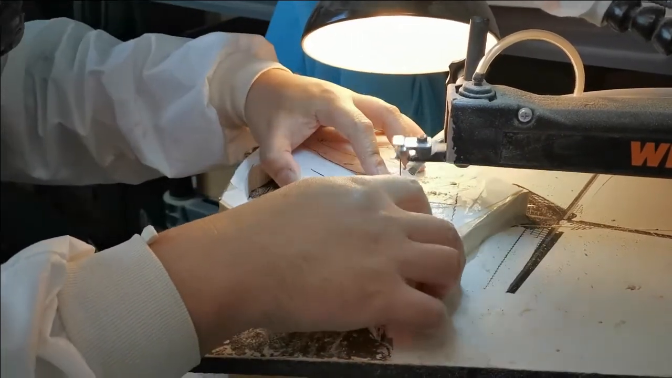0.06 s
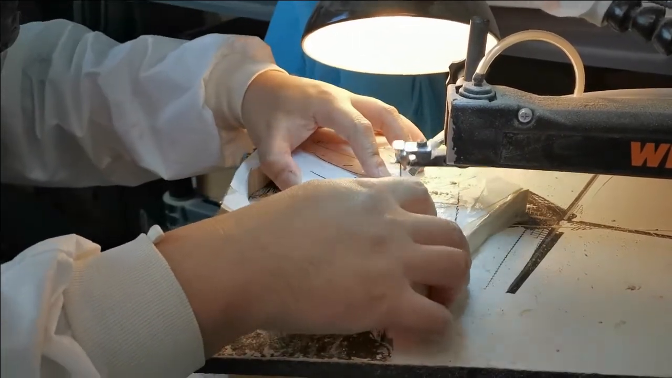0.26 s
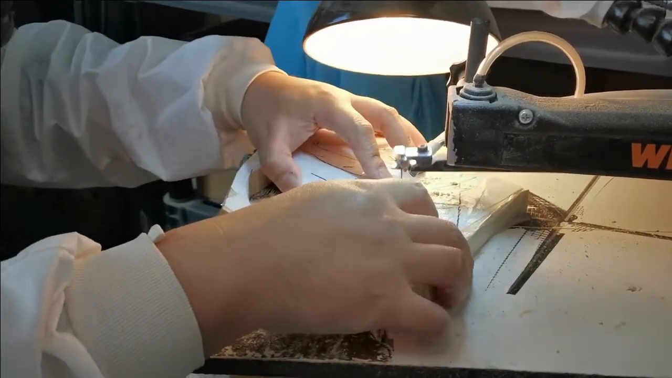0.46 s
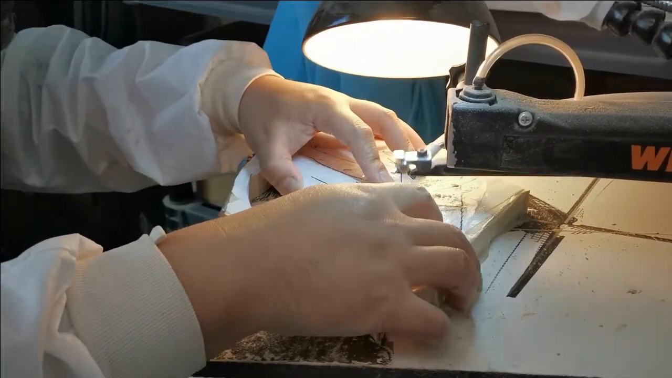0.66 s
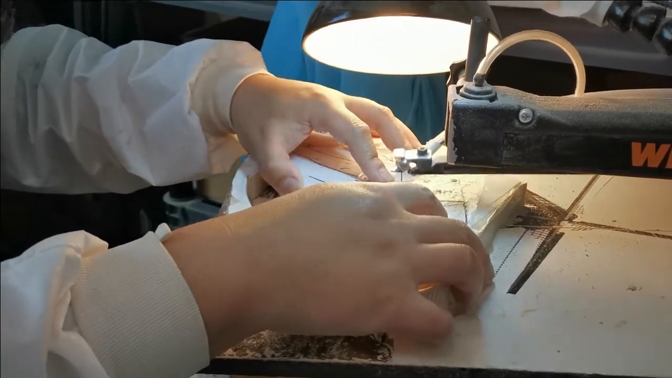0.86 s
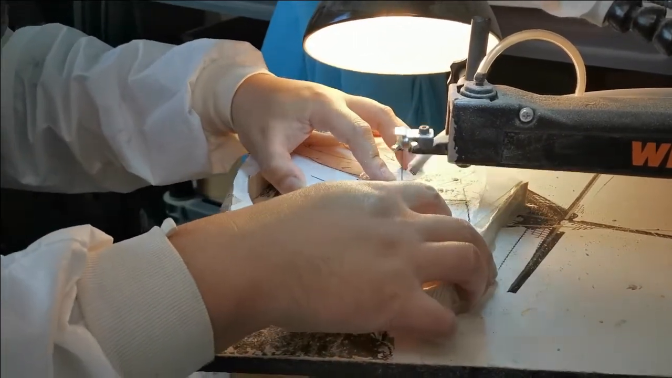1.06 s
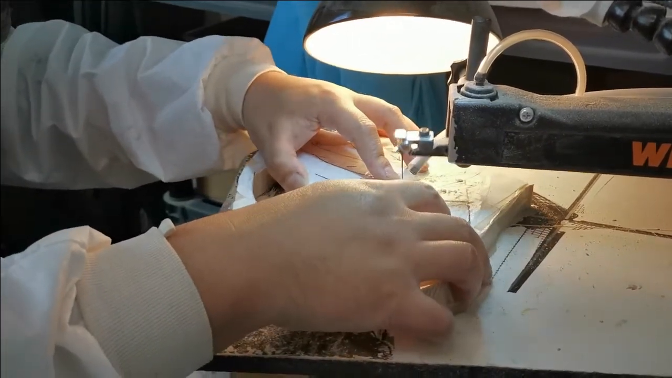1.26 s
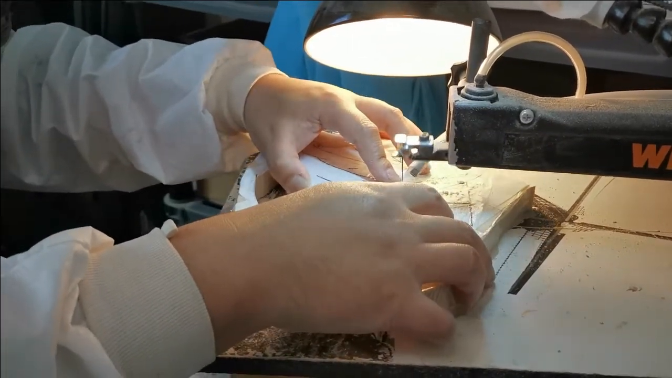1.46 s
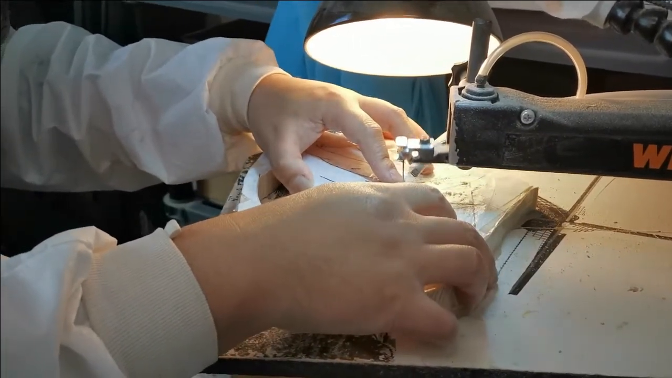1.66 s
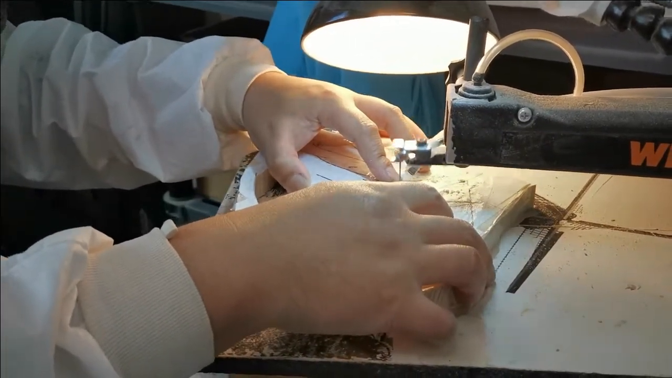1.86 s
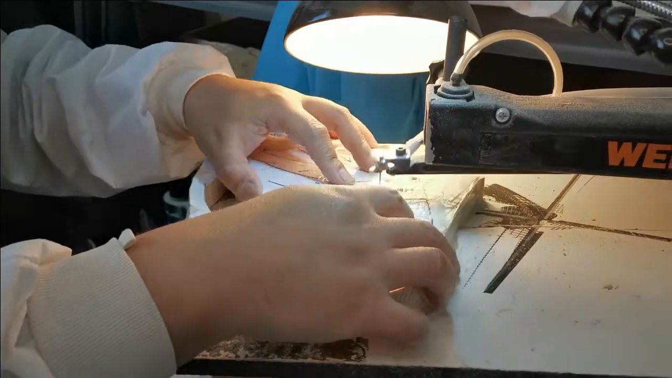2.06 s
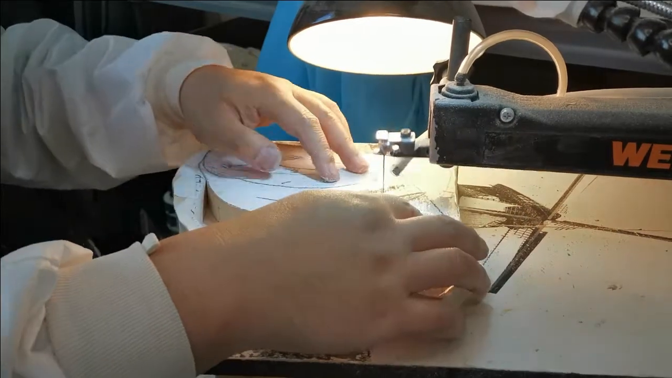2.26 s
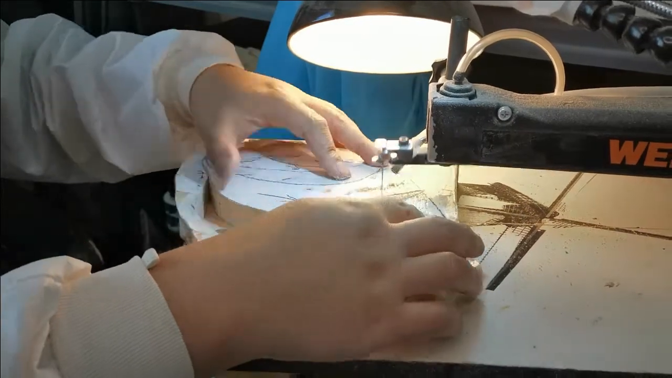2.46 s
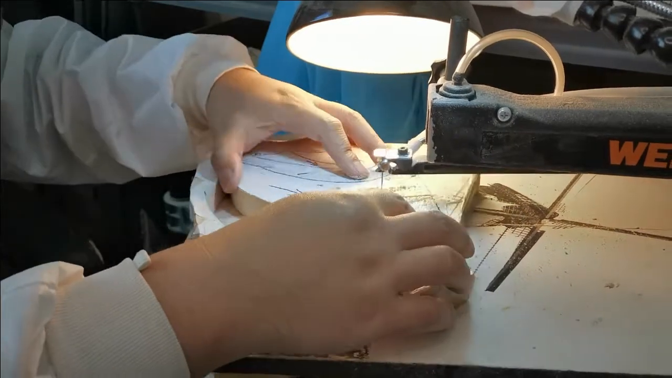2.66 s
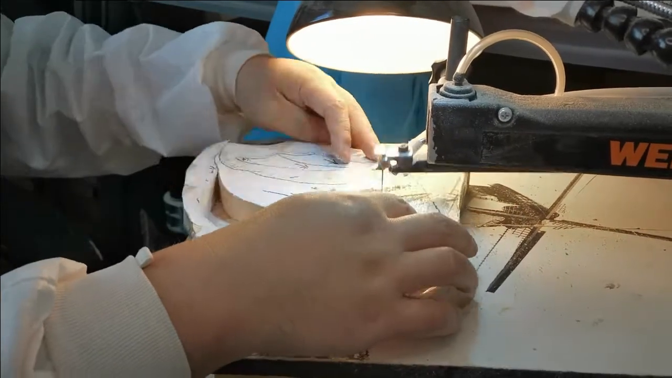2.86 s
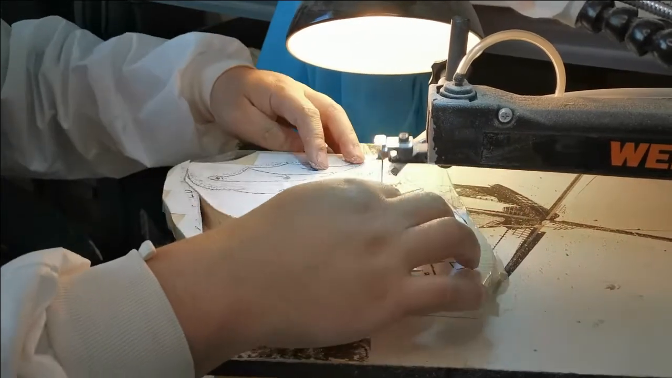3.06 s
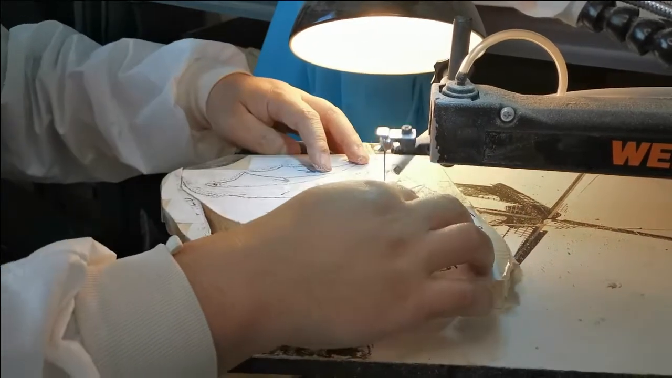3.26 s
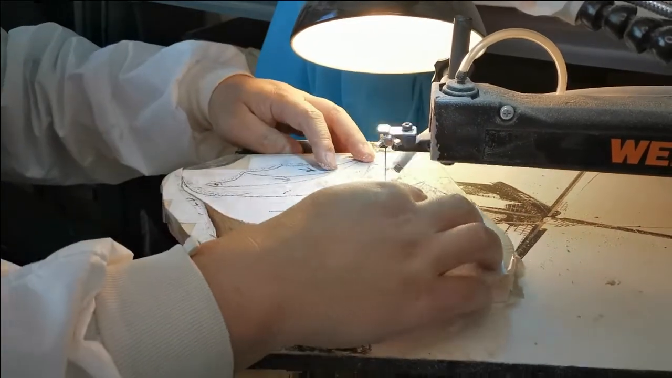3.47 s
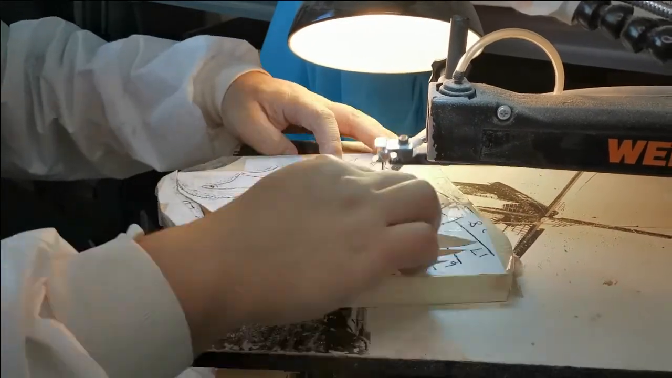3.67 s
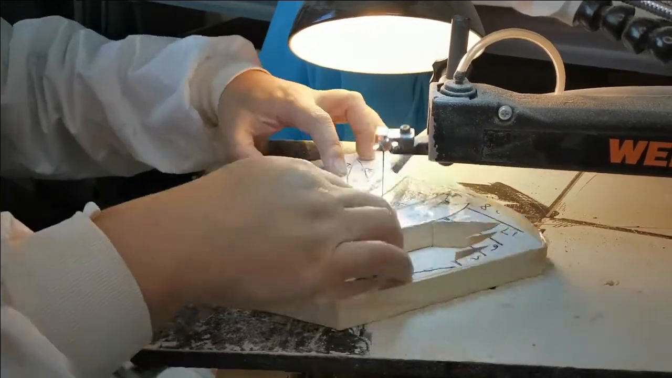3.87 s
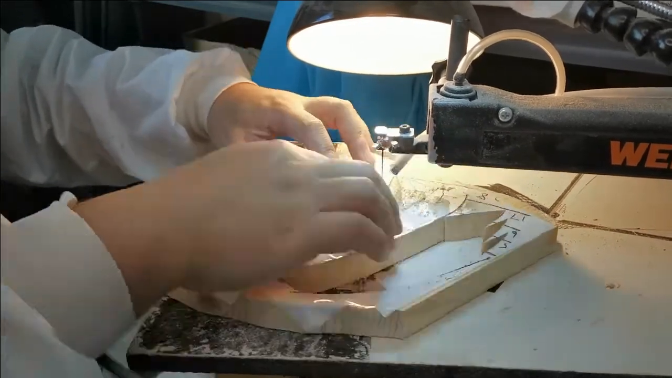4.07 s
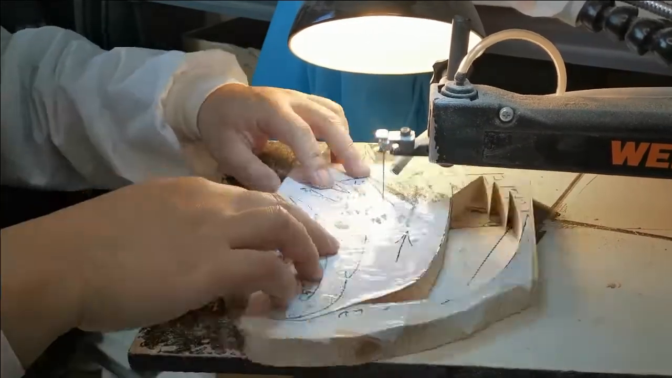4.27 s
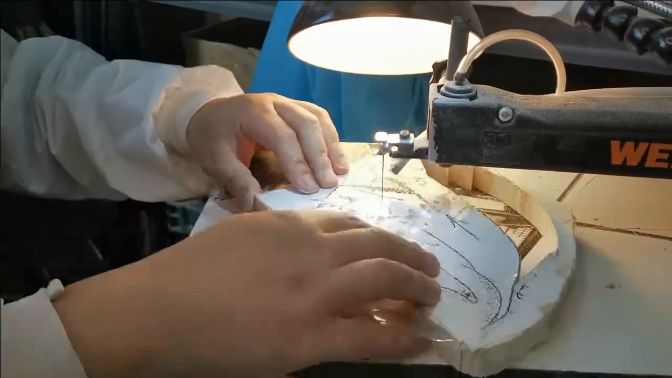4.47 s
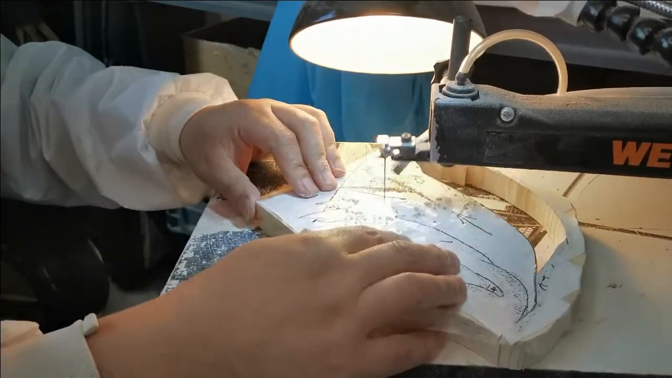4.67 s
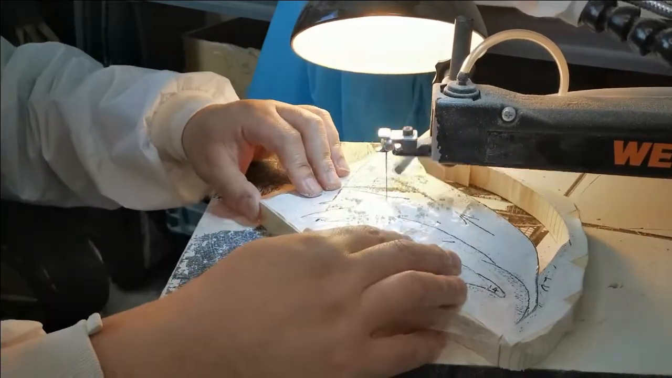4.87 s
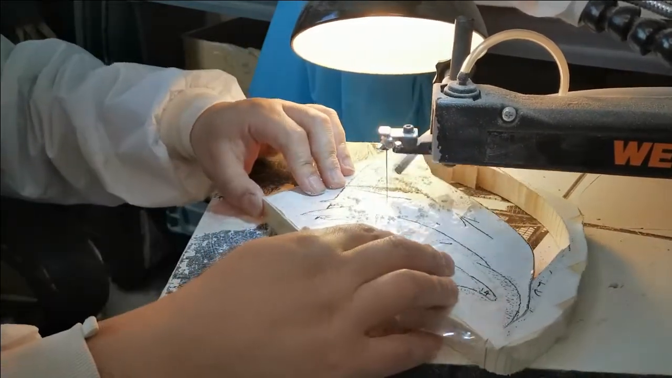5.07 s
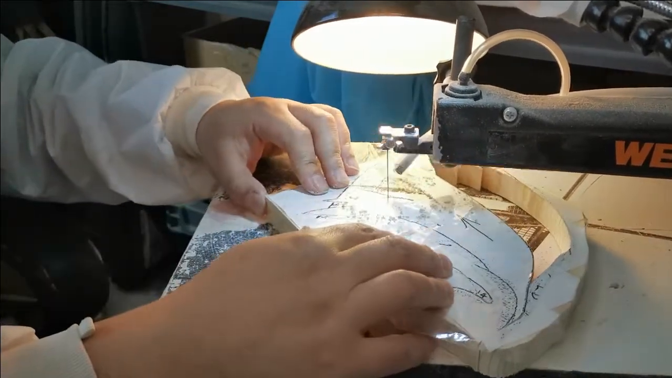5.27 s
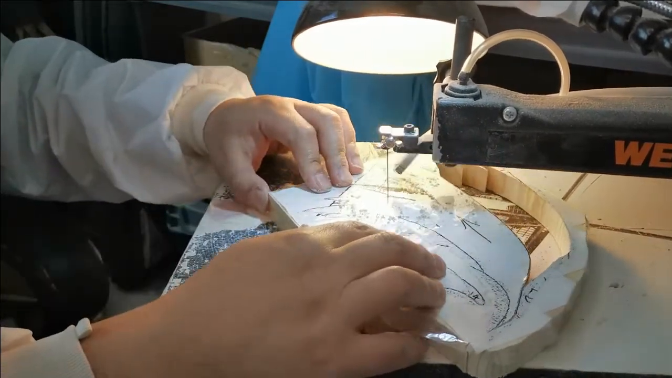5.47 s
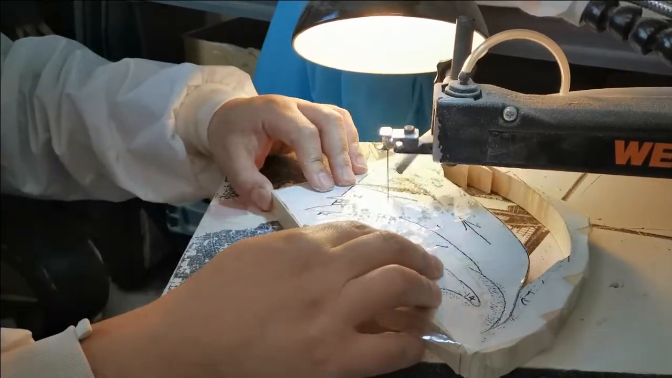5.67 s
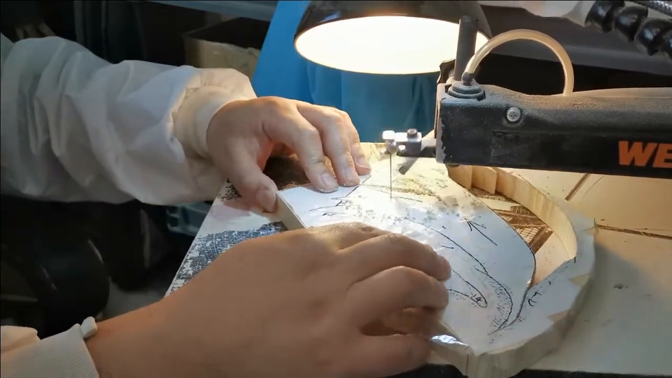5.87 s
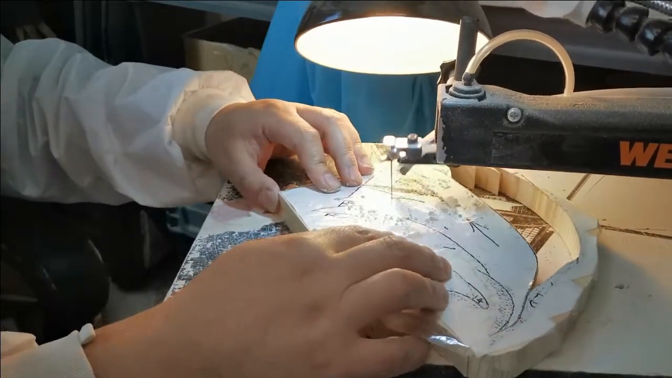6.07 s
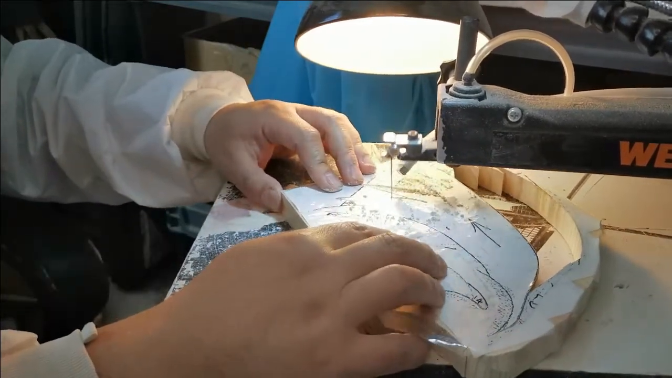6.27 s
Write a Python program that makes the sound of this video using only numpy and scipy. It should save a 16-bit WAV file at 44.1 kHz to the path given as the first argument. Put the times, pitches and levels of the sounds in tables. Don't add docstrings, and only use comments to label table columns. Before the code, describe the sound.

Close up, a fine-bladed powered saw chews wood in a dense, rapid buzz with uneven bites and slight gaps. The load drops after two seconds; the motor whines more exposed while teeth graze the board intermittently and wood drags on the metal table. Just before five seconds steady cutting returns with a harder metallic edge and lasts to the end, in a small indoor workshop.

```python
import sys
import numpy as np
from scipy import signal
from scipy.fft import rfft, irfft
from scipy.io import wavfile
from scipy.ndimage import uniform_filter1d

SR = 44100
rng = np.random.default_rng(int(sys.argv[2]) if len(sys.argv) > 2 else 0)


def pcm_store(signal):
    levels = np.round(np.clip(np.atleast_2d(signal), -1, 1) * 32767)
    wavfile.write(sys.argv[1], SR, levels.astype(np.int16).T)


def voltage_ratio(level):
    return 10 ** (np.asarray(level, float) / 20)


N = 278712
TIME, HZ = np.arange(N) / SR, np.arange(N // 2 + 1) * SR / N
SIDES = np.array([[.5], [-.5]])

# frequency in Hz, density in dB per Hz.
SHOP_SPECTRUM = [(25, -18.5), (90, -22), (280, -22.5), (480, -13.5), (1000, -12.5), (1300, -18.5),
                 (1900, -9.5), (2450, -15.5), (2900, -8.5), (3400, -18.5), (3900, -11.5), (5000, -20),
                 (6500, -17), (16000, -21)]
# multiple of the electrical tone, then idle level in dB of crank sidebands -4 to +4.
WHINE_TONES = [(1, -107, -94.5, -93, -87.5, -66, -111, -87, -85, -80),
               (2, -93, -78.5, -82, -62, -95, -57, -68, -76, -66.5),
               (3, -99, -77, -94, -79, -66.5, -82, -96, -81, -72.5),
               (4, -81, -80, -75.5, -81, -60, -59.5, -100, -77.5, -86),
               (5, -77, -90, -100, -99, -83, -99, -74, -71.5, -88),
               (6, -92, -94, -75, -105, -63, -92, -83, -105, -86),
               (8, -86, -83, -86, -73, -58.5, -62.5, -97, -89, -73),
               (10, -84, -88, -90, -86, -70.5, -88, -67, -87, -73),
               (12, -71, -112, -85, -55, -59.5, -53, -115, -83, -75)]
SIDEBAND_LOAD = [0.17, 0.62, 0.84, 0.32, 0.15, 0.35, 0.16, 0.55, 0.39]
# multiple of the stroke rate, level under feed in dB, level of the idle linkage in dB.
SHAKE_TONES = [(0.98, -43, -97), (2.01, -36, -95), (2.96, -30.5, -101), (4.07, -30, -94), (5.004, -18, -89),
               (6.01, -17, -98), (6.997, -1.5, -74), (8.03, -13, -85), (8.995, 1, -64.5), (10.08, -13, -74),
               (10.997, -6.5, -67), (11.87, -20.5, -75), (13.08, -24, -74), (13.76, -19, -80),
               (14.83, -17, -74.5), (16.03, -18, -95), (17.08, -8.5, -68.5), (18.12, -16, -75),
               (18.88, -8, -85), (19.95, -5.5, -72), (21.06, -9.5, -68.5), (22.14, -10, -85),
               (22.8, -13.5, -92), (24.34, -14, -81)]
# time in seconds, lead in ms.
CRANK_LEAD = [(0, 6.1), (.2, 6.3), (.6, 5.4), (1.2, 3.3), (1.8, 1.8), (2, 2.2), (2.2, 3.5), (2.4, 5.7),
              (2.6, 6.7), (3.2, 12.1), (3.4, 12.2), (3.8, 14.7), (4.2, 16.4), (4.6, 15.8), (5.2, 15.1),
              (5.4, 14.2), (6, 12.3), (6.32, 12.1)]
# start in seconds, length in seconds, level in dB.
DRAG_PULLS = [
    (2.15, 0.27, -62),
    (2.95, .4, -55),
    (3.853, 0.5, -53),
    (4.198, 0.29, -47.5),
    (4.45, .3, -49),
]
# start and end in seconds, pressure in dB at start and at end,
# grab of the blade in the kerf in dB.
FEED_PUSHES = [(0, 0.187, -1.8, 0.6, 1.1), (0.218, 0.337, -1.3, .4, 0.8), (.36, 0.54, -3, -4, -0.5),
               (0.548, 0.715, -0.7, 3.5, -0.3), (0.717, 1.27, 2, -3, 2.5), (1.27, 1.62, -2.1, 0.5, 1.2),
               (1.622, 1.903, 1.8, -1, 0), (4.802, 4.958, -7.5, -2, 3.5), (4.964, 5.253, -2.5, -3.5, 8),
               (5.252, 5.422, -4, -2, 5.5), (5.42, 5.8, -2.5, -1.5, 9), (5.8, 6.0, -3.5, -3, 9),
               (6.004, 6.18, -4, -4, 9), (6.17, 6.33, -2.5, -4, 11)]
# start and end in seconds, pressure in dB at start
# and at end, grab in dB.
TURNING_TOUCHES = [(2.02, 2.08, -18, -17, -2), (2.198, 2.27, -17.5, -16.5, 1), (2.3, 2.38, -8.5, -12, -1.5),
                   (2.396, 2.47, -9.5, -7, -3), (2.53, 2.66, -28, -19, 4), (2.676, 2.69, -13.5, -17, 2),
                   (2.995, 3.055, -16.5, -18, 1), (3.077, 3.14, -22, -14, -1),
                   (3.149, 3.263, -7, -7.5, -3.5), (3.26, 3.665, -8.5, -11, -3),
                   (3.82, 3.93, -21.5, -9.5, -0.5), (3.93, 4.082, -8.5, -15.5, .1),
                   (4.156, 4.379, -22, -4.5, 5.5), (4.382, 4.439, -5, -7.5, 3),
                   (4.466, 4.58, -11.5, -10, 0.7), (4.585, 4.771, -14.5, -3, 1.3)]
# time in seconds, thickness from 0 to 1.
WOOD_THICKNESS = [(0, 0.12), (1.9, 0.73), (2.2, 0.05), (4.3, 0.52), (4.9, 0.72), (6.32, 0.73)]
# time in seconds, blade peak in dB, board in dB against the blade.
HARD_BITES = [(0.0732, -21, -18), (0.2538, -24, -19), (0.5137, -26, -25), (0.6918, -21, -6),
              (0.8155, -19.5, -5), (0.8555, -20.5, -5), (1.036, -20.5, -13), (1.4541, -17.5, -12.5),
              (1.5948, -21.5, -5), (1.6746, -20.5, -2.5), (1.7145, -17.5, -11), (1.7554, -20, -9),
              (1.7953, -19, -10), (2.4334, -29, -26), (4.3415, -24, -6), (4.9018, -18, -12),
              (5.0818, -15, -15), (5.1637, -14, -22), (5.224, -17, -6), (5.4435, -16, -10),
              (5.4829, -16.5, -5), (5.6441, -15, -6), (5.7029, -18, -5.5), (5.7633, -21.5, -5),
              (5.8257, -15.5, -13), (5.9668, -18, -15), (6.1454, -18.5, -5), (6.2043, -16, -7),
              (6.2248, -12.5, -11), (6.2851, -18, 0.5)]
# frequency in Hz, width in Hz, level in dB, left minus right in dB.
BOARD_MODES = [(698, 21, -29, 11), (1028, 86, -6.5, -10), (1540, 95, -1.5, -2.5), (1687, 15, -3, -10),
               (1814, 38, -2.5, -15), (2070, 50, -5, -11.5), (2300, 25, -5.5, -11), (2710, 38, 0, 2),
               (2913, 306, -2.5, 0)]
# frequency in Hz, width in Hz, level in dB, left minus right in dB.
BLADE_MODES = [(3740, 110, -6, -1), (4080, 300, -21, -1), (4465, 140, 0, -1), (4600, 190, -5, 0)]
# frequency in Hz, width in Hz, level in dB, left minus right in dB,
# change deep in the wood in dB.
TEETH_MODES = [(5720, 250, -17, 0, 10), (6350, 250, -10, 0, -4), (6920, 280, -1, 1, -11),
               (7780, 300, -6, 1, -7), (8340, 250, -1, 2, -8), (8630, 170, 1, -8, 1.5),
               (9250, 500, -3, -3, -5)]
# frequency in Hz, width in Hz, level in dB, left minus right in dB,
# change deep in the wood in dB.
DUST_MODES = [(10250, 300, 1, -2, -4), (11000, 800, 4, -2, -7), (11900, 400, -4, -2, 1),
              (12900, 600, -18, -2, 13), (13900, 500, -3, -2, 1), (14700, 400, -6, -3, 3),
              (15620, 300, 0, -5, 2)]

# dB at full pressure, dB per dB of pressure, dB per dB of grab, dB per thickness.
SHAKE_LAW, BOARD_LAW, BLADE_LAW = (-53.5, 0.7, 0.06, 4.5), (-42, 0.85, 0.9535, 2), (-39, 1.19, 0.9061, 2.5)
TEETH_LAW, DUST_LAW = (-32, 1.2, 0, -0.5), (-36, 0.82, 0.33, -8)
TURNED_S, TURN_TAKES_S, DUST_DEPTHS = 2.0, .15, (0.15, 0.78, 1)

STROKE_HZ, WHINE_HZ, MAINS_HZ = 50, 240.08, 100
SHOP_DB, MAINS_DB = -44.5, -78
LOAD_FALL = 0.024
BLADE_CREST_DB, BOARD_CREST_DB = 14, 8.5
HAND_STEP, GRAB_SLEW_S = 44, .03
PRESS_DB_PER_S, EASE_DB_PER_S, CLEAR_DB = 450, 556, -47
DRAG_LO_HZ, DRAG_HI_HZ, DRAG_GRIT_DB = 380, 1500, 3.5
BRUSH_DB_PER_DB, BRUSH_MAX_DB = 1.7, 5.5
LEFT_LAG_S, TOP_HZ = 5e-5, 15830


def level(x, db):
    return x * voltage_ratio(db) / np.sqrt(np.mean(x ** 2))


def walk(rate):
    count = int(N / SR * rate) + 2
    return 1.2 * np.interp(TIME * rate, np.arange(count), rng.standard_normal(count))


def tails(t60, gap):
    s = TIME[:SR // 2]
    decay = np.exp(-np.log(1000) * s / t60)
    tail = rng.standard_normal((2, len(s))) * decay * (s >= gap)
    return rfft(tail / np.sqrt(np.sum(tail ** 2, axis=1, keepdims=True)), N)


def room(x, t60):
    return irfft(rfft(x) * tails(t60, 0.00323), N)


def shop(crank):
    hz, db = np.transpose(SHOP_SPECTRUM)
    colour = voltage_ratio(np.interp(np.log(HZ + 1), np.log(hz), db))
    alike = np.clip(0.93 / (1 + (HZ / 2500) ** 2) / (1 + (90 / (HZ + 1)) ** 2), 0, 1)
    mid, side = rfft(rng.standard_normal((2, N)))
    ports = np.sqrt(1 + alike) * mid + 2 * SIDES * np.sqrt(1 - alike) * side
    noise = irfft(colour * ports, N)
    throb_db = 0.5 * np.cos(2 * np.pi * crank)
    return level(noise, SHOP_DB - 3.0) * voltage_ratio(throb_db + 1.8 * walk(15) - 2.8 * SIDES)


def whine(crank, shake_db):
    load_db = np.clip(shake_db + 70.5, 0, 30)
    throb = np.array([voltage_ratio(share * load_db) * np.exp(2j * np.pi * side * (crank + 0.36))
                      for side, share in zip(range(-4, 5), SIDEBAND_LOAD)])
    tones = voltage_ratio(MAINS_DB + 1.8 * walk(3.63)) * np.cos(2 * np.pi * MAINS_HZ * TIME)
    for k, *levels_db in WHINE_TONES:
        carrier = np.exp(2j * np.pi * (k * WHINE_HZ * TIME + 0.088 * walk(7)))
        sway = voltage_ratio(0.97 * walk(7) - LOAD_FALL * k * load_db)
        throbbed = voltage_ratio(np.array(levels_db)) @ throb
        tones = tones + sway * np.real(carrier * throbbed)
    return np.sqrt(2) * tones * voltage_ratio(-4.5 * SIDES)


def shake(crank, shake_db):
    pull = voltage_ratio(shake_db + 1.5)
    hum = np.zeros(N)
    for k, feed_db, idle_db in SHAKE_TONES:
        strength = (voltage_ratio(feed_db) * pull + voltage_ratio(idle_db)) * (1 + 0.14 * walk(12))
        wander = 0.06 * k * walk(9)
        hum += strength * np.cos(2 * np.pi * k * (crank + 0.1502) + wander)
    return np.sqrt(2) * hum * voltage_ratio(-4.0 * SIDES)


def drag():
    swell = sum(voltage_ratio(db) * np.sin(np.pi * np.clip((TIME - at) / length, 0, 1)) for at, length, db in DRAG_PULLS)
    grit = rng.standard_normal(N) * voltage_ratio(DRAG_GRIT_DB * walk(300) + 1.5 * walk(24.96))
    band = signal.butter(2, [DRAG_LO_HZ, DRAG_HI_HZ], "band", fs=SR, output="sos")
    scuff = signal.sosfilt(band, grit)
    return level(scuff, 0) * swell * voltage_ratio(-3.5 * SIDES)


def feed():
    s = TIME[::HAND_STEP]
    pressure, grab = np.full(len(s), 1. * CLEAR_DB), np.zeros(len(s))
    for start, end, first_db, last_db, grab_db in FEED_PUSHES + TURNING_TOUCHES:
        push = np.interp(s, [start, end], [first_db, last_db])
        push = push - PRESS_DB_PER_S * np.clip(start - s, 0, None)
        push = push - EASE_DB_PER_S * np.clip(s - end, 0, None)
        grab = np.where(push > pressure, grab_db, grab)
        pressure = np.maximum(push, pressure)
    grab = uniform_filter1d(grab, int(GRAB_SLEW_S * SR / HAND_STEP) + 1)
    return np.interp(TIME, s, pressure), np.interp(TIME, s, grab)


def body(modes, deep):
    hz = np.arange(2049) * SR / 4096 + 1
    power = sum(voltage_ratio(m[2] + m[3] * SIDES + deep * m[-1]) ** 2 / (1 + ((hz - m[0] ** 2 / hz) / m[1]) ** 2)
                for m in modes)
    cepstrum = irfft(np.log(power) / 2)
    cepstrum[:, 1:2048] *= 2
    cepstrum[:, 2049:] = 0
    return rfft(irfft(np.exp(rfft(cepstrum))), N)


def ring(force, modes, skirt_db, apart_db, depth=None):
    lo, hi = modes[0][0] * 0.35, modes[-1][0] * 1.11
    band = 1 / (1 + (lo / (HZ + 1)) ** 8) / (1 + (HZ / hi) ** 8)
    push = rfft(force)
    skirt = voltage_ratio(skirt_db) * push[0] * tails(0.04, 0)
    heard = push[0] + voltage_ratio(apart_db) * push[1:]
    ends = [0] if depth is None else [0, 1]
    sound = [level(irfft(band * (body(modes, deep) * heard + skirt), N), 0) for deep in ends]
    if depth is None:
        return sound[0]
    return (1 - depth) * sound[0] + depth * sound[1]


def rasp(turns, size_db, cut, sag, fade, back_db, rest_db, grit_db, knock_db, squeal_hz=1000, squeal_db=-60):
    phase, stroke = turns % 1, turns.astype(int)
    onset = np.clip(phase / .015, 0, 1)
    bite = onset * np.exp(-phase / sag - np.clip(phase - cut, 0, 1) / fade)
    down = bite * voltage_ratio(size_db[stroke])
    up = voltage_ratio(back_db) * np.exp(-((phase - .7) / .13) ** 2)
    force = rng.standard_normal((3, N)) * voltage_ratio(grit_db * walk(900)) * (down + up + voltage_ratio(rest_db))
    squeal_phase = 2 * np.pi * np.cumsum(squeal_hz * (1 + 0.016 * walk(60))) / SR
    force[0] += voltage_ratio(squeal_db) * down * np.sin(squeal_phase)
    force[0, 1:] += voltage_ratio(knock_db + size_db[stroke[1:]]) * np.diff(stroke)
    return force


def cutting(crank, board_db, blade_db, teeth_db, dust_db):
    turns = crank + .21
    luck = rng.standard_normal((int(turns[-1]) + 1, 4)).T
    blade_size = 1.4 * luck[0] - 2
    board_size = 2.5 * luck[1] + .3 * luck[0]
    teeth_size = 1.1 * luck[2] + .7 * luck[0]
    at, peak_db, rel_db = np.transpose(HARD_BITES)
    hard = np.interp(at + .004, TIME, turns).astype(int)
    blade_size[hard] = peak_db - np.interp(at, TIME, blade_db) - BLADE_CREST_DB
    board_size[hard] = peak_db + rel_db - np.interp(at, TIME, board_db) - BOARD_CREST_DB
    cut = np.clip(0.32 + 0.0027 * (teeth_db + 39), .1, .45)
    depth = np.clip(np.interp(TIME, *np.transpose(WOOD_THICKNESS)), 0, 1)
    dust_depth = np.clip(np.interp(TIME, [0, TURNED_S, TURNED_S + TURN_TAKES_S], DUST_DEPTHS), 0, 1)
    brush_db = np.clip(BRUSH_DB_PER_DB * (TEETH_LAW[0] - teeth_db), 0, BRUSH_MAX_DB)

    board = rasp(turns, board_size, .32, .7, .08, -7, -10, 1.5, 15, 1535, -15)
    blade = rasp(turns - .04, blade_size, .29, 1.5, .05, -10, brush_db - 16, 1.5, 0, 4470, -7)
    teeth = rasp(turns, teeth_size, cut, .55, .06, -12, brush_db - 15, 2.1, 11)
    dust = rasp(turns, teeth_size, cut, .55, .06, -12, brush_db - 12, 2.1, 8)

    board = ring(board, BOARD_MODES, -24, -13)
    blade = ring(blade, BLADE_MODES, -24, -7)
    teeth = ring(teeth, TEETH_MODES, -21, -4.5, depth)
    dust = ring(dust, DUST_MODES, -19, -1.5, dust_depth)
    return board * voltage_ratio(board_db) + blade * voltage_ratio(blade_db) + teeth * voltage_ratio(teeth_db) + dust * voltage_ratio(dust_db)


def scene():
    thickness = np.interp(TIME, *np.transpose(WOOD_THICKNESS))
    controls = np.array([np.ones(N), *feed(), thickness])
    laws = np.array([SHAKE_LAW, BOARD_LAW, BLADE_LAW, TEETH_LAW, DUST_LAW])
    shake_db, board_db, blade_db, teeth_db, dust_db = laws @ controls
    lead_ms = np.interp(TIME, *np.transpose(CRANK_LEAD))
    crank = STROKE_HZ * TIME + lead_ms * STROKE_HZ / 1000
    saw = cutting(crank, board_db, blade_db, teeth_db, dust_db)
    drive = shake(crank, shake_db) + whine(crank, shake_db)
    tail = room(voltage_ratio(-11) * saw + voltage_ratio(-16) * drive, .2)
    return saw + drive + tail + shop(crank) + drag()


def roll_off(x):
    return signal.sosfilt(signal.butter(12, 16160, fs=SR, output="sos"), x)


def record(dry):
    lag = 1.6 * np.tanh(2 * np.pi * HZ * LEFT_LAG_S / 1.6)
    late = rfft(dry) * np.exp(-1j * lag * (SIDES + .5))
    top_cut = np.clip((TOP_HZ - HZ) / 60, 0, 1)
    return roll_off(irfft(late * top_cut, N))


dry = scene()
out = record(dry)
pcm_store(out)
```